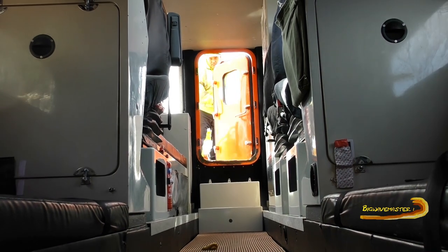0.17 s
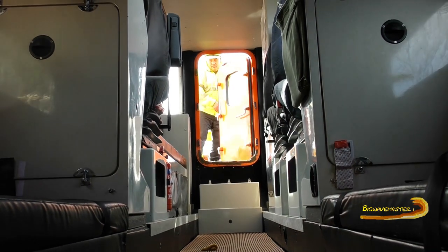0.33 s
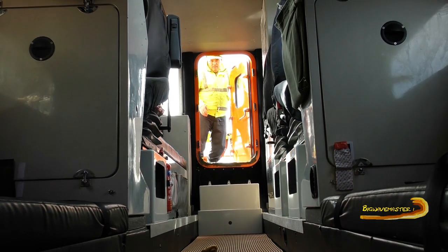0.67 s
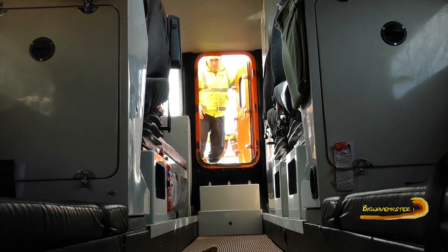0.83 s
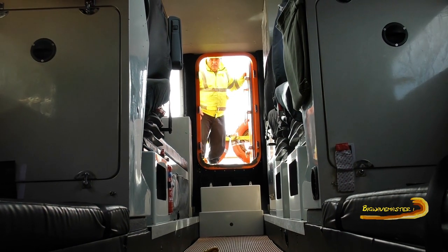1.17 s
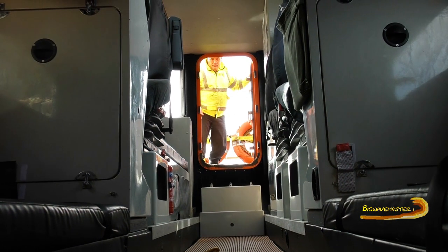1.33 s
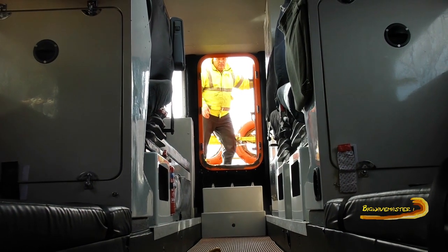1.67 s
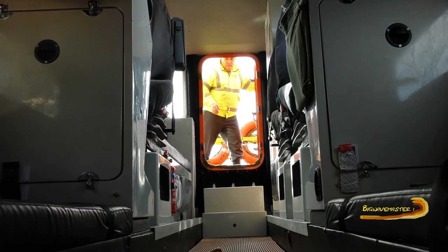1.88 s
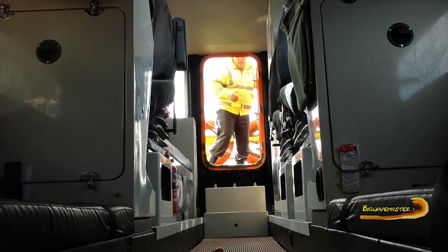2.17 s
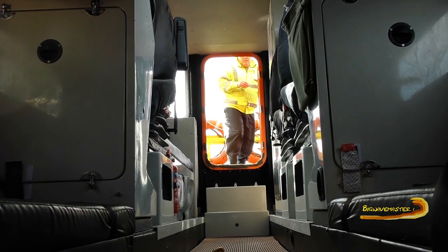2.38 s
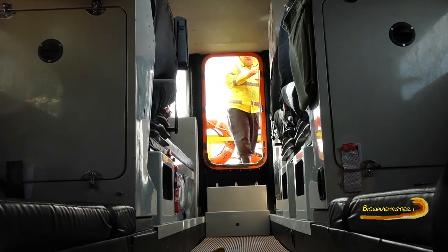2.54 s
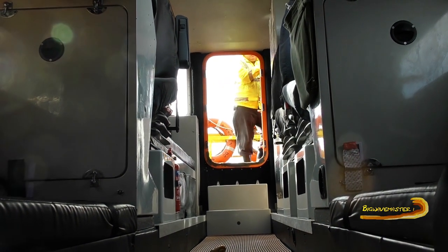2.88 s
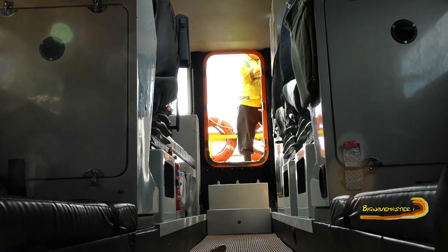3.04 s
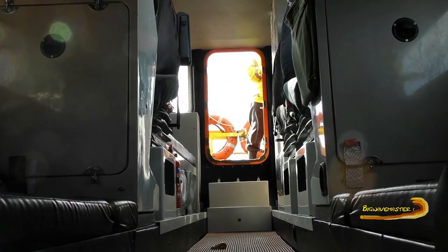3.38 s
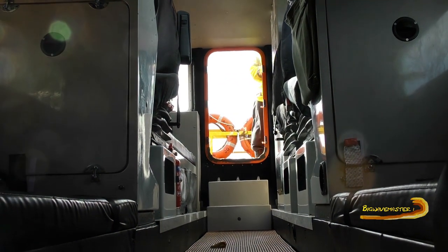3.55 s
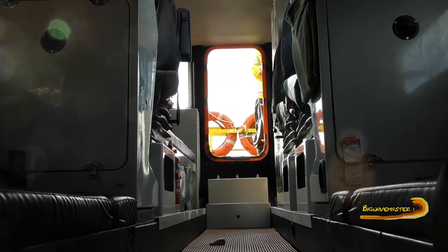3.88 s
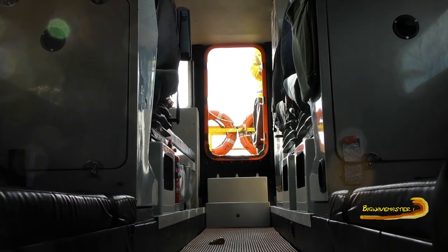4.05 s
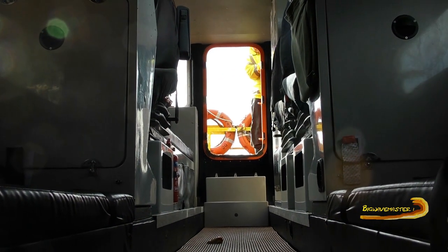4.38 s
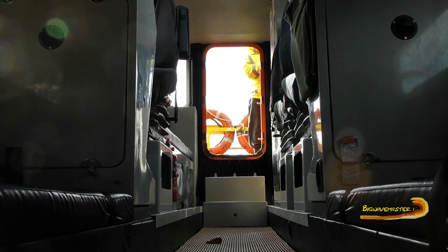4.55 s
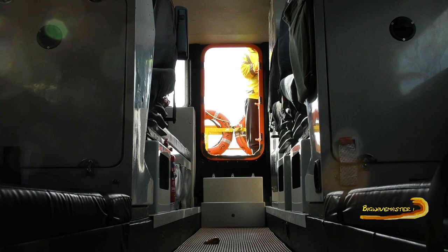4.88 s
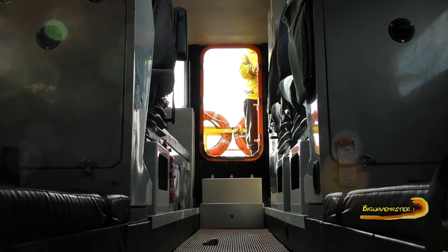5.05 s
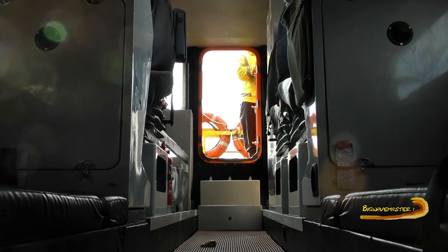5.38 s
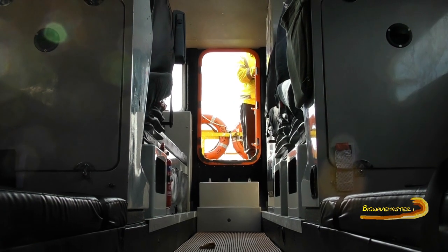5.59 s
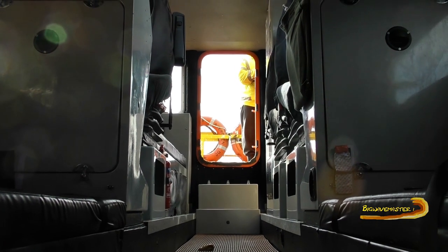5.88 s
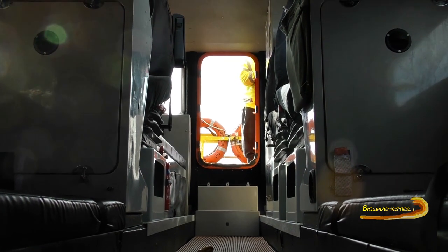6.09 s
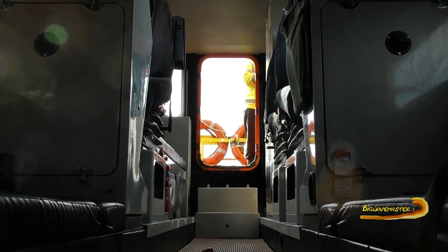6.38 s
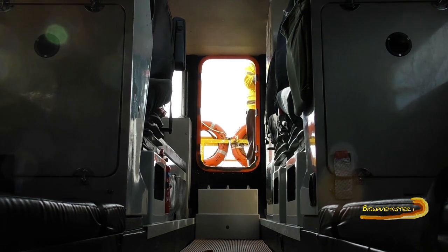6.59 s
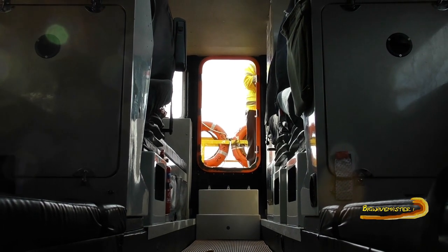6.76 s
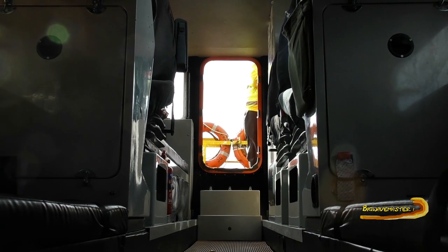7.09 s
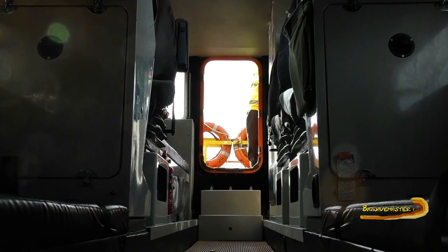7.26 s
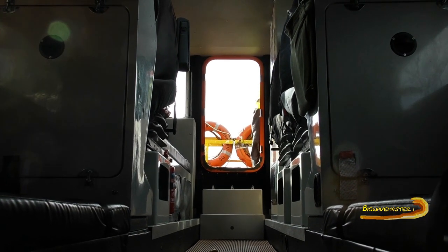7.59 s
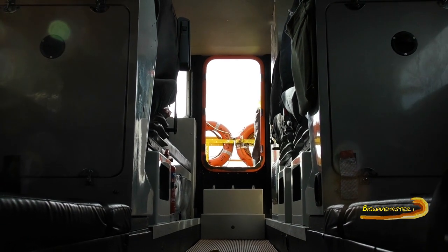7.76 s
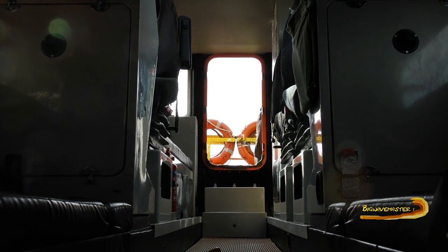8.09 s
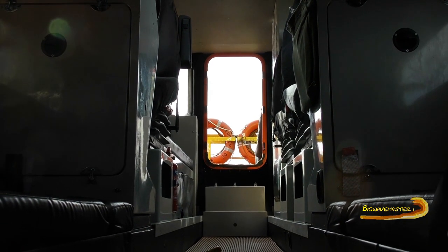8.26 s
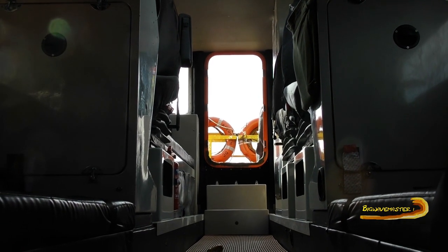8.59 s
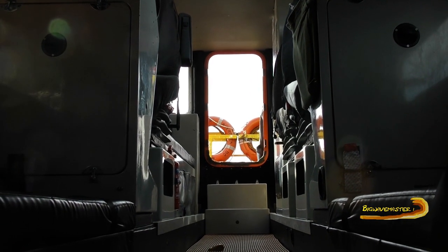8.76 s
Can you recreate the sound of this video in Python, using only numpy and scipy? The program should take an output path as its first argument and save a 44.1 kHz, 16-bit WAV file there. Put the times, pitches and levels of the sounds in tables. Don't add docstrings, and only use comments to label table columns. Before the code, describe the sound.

Heard from inside a small enclosed boat cabin: a sudden steel clang and short rattle, then a low, slightly lumpy diesel drone that seems to grow over four seconds as the microphone gain recovers. Hull and panels hum around it. Fabric scuffs, a sharp slap around three seconds, more rubbing, and thudding boot knocks near seven and eight and a half seconds. Stereo, with the left shadowed in the middle and upper range.

```python
import sys
import numpy as np
from scipy import signal
from scipy.io import wavfile
from scipy.ndimage import uniform_filter1d

SR = 44100
rng = np.random.default_rng(int(sys.argv[2]) if len(sys.argv) > 2 else 0)


def int16_out(signal):
    q = np.round(np.clip(np.atleast_2d(signal).T, -1, 1) * 32767)
    wavfile.write(sys.argv[1], SR, q.astype(np.int16))


def volts_from_db(level):
    exponent = np.asarray(level, float) / 20
    return 10 ** exponent


N = 393813


def rms_one(x):
    return x / np.sqrt(np.mean(x ** 2) + 1e-20)


def in_time(rows):
    s, *columns = np.transpose(rows)
    return [np.interp(np.arange(N) / SR, s, column) for column in columns]


def at_hz(points, hz):
    point_hz, value = np.transpose(points)
    return np.interp(np.log(hz), np.log(point_hz), value)


def drift(rate_hz):
    pole = np.exp(-2 * np.pi * rate_hz * 40 / SR)
    white = rng.standard_normal(N // 40 + 2002)
    slow = signal.lfilter([1], [1, -2 * pole, pole ** 2], white)[2000:]
    return np.interp(np.arange(N) / 40, np.arange(len(slow)), rms_one(slow))


def band_pass(x, low_hz, high_hz, order=2):
    return signal.sosfilt(signal.butter(order, [low_hz, high_hz], "band", fs=SR, output="sos"), x)


def high_pass(x, hz, order):
    return signal.sosfilt(signal.butter(order, hz, "high", fs=SR, output="sos"), x)


def ring(x, hz, width_hz):
    pole = np.exp(-np.pi * width_hz / SR)
    turn = 2 * np.pi * hz / SR
    return signal.lfilter([0, np.sin(turn)], [1, -2 * pole * np.cos(turn), pole ** 2], x + 1e-18)


# frequency in Hz, correlation 0-1.
PORT_LIKENESS = [(30, 0.6), (150, 0.8), (300, 0.88), (600, 0), (1500, 0.46), (5000, 0.13), (12000, 0.47)]


def ports(white, hz):
    alike = np.clip(at_hz(PORT_LIKENESS, hz), 0, 1)
    left = alike * white[0] + np.sqrt(1 - alike ** 2) * white[1]
    return np.array([left, white[0]])


def banded_noise(spectrum, patchy_db, count):
    edges_hz = np.geomspace(spectrum[0][0], min(spectrum[-1][0], 19000), count + 1)
    together = drift(3.2)
    white = rng.standard_normal((2, 2, N))
    out = 0
    for k, (low_hz, high_hz) in enumerate(zip(edges_hz, edges_hz[1:])):
        hz = np.sqrt(low_hz * high_hz)
        flicker_db = patchy_db * (0.4 * together + drift(22))
        band = band_pass(white[k % 2], low_hz, high_hz)
        out = out + volts_from_db(at_hz(spectrum, hz) + flicker_db) * ports(band, hz)
    return rms_one(out)


# frequency in Hz, level in dB, t60 in s.
DOOR_MODES = [(411, -14.5, 0.73), (449, -14, 0.19), (680, -18, .12), (835, -18, 0.33), (950, -8, .12),
              (1262, -5.5, 0.11), (1762, -11.5, 0.13), (2900, -17, 0.11), (3170, -16, 0.067),
              (3600, -19, 0.067), (5250, -20, 0.064)]


def door(level_db, rattle_s):
    t = np.arange(SR) / SR
    fade = np.exp(-(t / rattle_s) ** 2) / np.sqrt(rattle_s * SR)
    out = np.zeros((2, N))
    for hz, db, t60_s in DOOR_MODES:
        rattle = rng.standard_normal((2, SR)) * fade
        out[:, :SR] += volts_from_db(level_db + db) * ring(ports(rattle, hz), hz, 2.65 / t60_s)
    return out


# start in s, level in dB, t60 in s, centre in Hz.
SLAPS = [
    (0, -21, 0.18, 1940),
    (0, -31, 0.21, 5500),
    (.025, -25, 0.38, 427),
    (2.995, -26, 0.48, 1790),
    (2.988, -33.5, 0.27, 5500),
    (6.457, -43.5, 0.15, 8000),
    (7.173, -28, 0.075, 1500),
    (8.572, -30.5, 0.13, 1100),
]
# peak time in s, level in dB, rise in s, centre in Hz.
BRUSHES = [(0.554, -42, 0.074, 2700), (1.859, -47.5, .045, 4500), (2.259, -46, 0.025, 5100),
           (2.51, -47, 0.069, 9500), (2.525, -38, 0.078, 3180), (2.67, -50, 0.11, 7500),
           (2.975, -29.5, .035, 1980), (3.08, -46, 0.15, 4000), (3.621, -41.5, 0.089, 8800),
           (3.6, -35, 0.055, 3600), (3.65, -29.5, 0.049, 3230), (4.329, -49, .18, 5500),
           (6.57, -44.5, 0.077, 3600), (7.67, -50, .06, 6600), (8.5, -56, 0.034, 8000)]


def scuffs(grain_db):
    # s, dB, rise s, fall s, power of the fall, Hz, octaves
    strokes = [(s, db, rise_s, rise_s, 2, hz, 1.3) for s, db, rise_s, hz in BRUSHES]
    strokes += [(s, db, 0.0074, 2 * t60_s / np.log(1000), 1, hz, 2.14) for s, db, t60_s, hz in SLAPS]
    out = np.zeros((2, N))
    for s, db, rise_s, fall_s, power, hz, octaves in strokes:
        first = max(int((s - 2 * rise_s) * SR), 0)
        t = np.arange(first, min(first + SR, N)) / SR - s
        rise = np.exp(-2 * (t / rise_s) ** 2)
        fall = np.exp(-2 * np.abs(t / fall_s) ** power)
        swell = np.where(t < 0, rise, fall)
        white = ports(rng.standard_normal((2, SR)), hz)[:, :len(t)]
        low_hz, high_hz = np.minimum(hz * 2 ** (octaves * np.array([-0.5, 0.5])), 0.45 * SR)
        band = band_pass(white, low_hz, high_hz)
        band = signal.lfilter([1], [1, -0.8], band)
        out[:, first:first + len(t)] += volts_from_db(db) * swell * rms_one(band)
    return out * volts_from_db(grain_db * drift(49))


# time in s, firings per s.
SPEED = [(0.0, 66.262), (0.75, 66.102), (3.75, 66.233), (5.25, 66.175), (6.5, 66.11), (8.25, 66.152),
         (9.0, 66.085)]
# header lag in ms, strength in dB, bank 0 or 1.
CYLINDERS = [(0.1, -3.7, 1), (-1.2, -2.4, 1), (5.3, 2.9, 0), (2.4, 8.0, 1), (0.5, 8.0, 0), (-1.5, 5.2, 0),
             (3.0, -3.7, 1), (4.0, -8.0, 0)]
# frequency in Hz, width in Hz, dB from bank 0, dB from bank 1.
PIPES = [(66.4, 8.0, -11.6, -6.1), (113.1, 49.8, -1.8, -5.2), (129.4, 8.0, -0.4, -3.4),
         (158.9, 8.0, -13.2, -17.5), (179.1, 12.4, 2.1, -3.9), (207.0, 10.3, -8.5, -16.4),
         (246.1, 8.0, -35.6, -12.5), (286.4, 8.0, -40.0, -29.7)]
# frequency in Hz, sharpness as Hz over width.
NOTCHES = [(226, 16), (322, 12)]


def firings(uneven_db, uneven_ms):
    run_in = SR // 2
    per_s = np.r_[np.full(run_in, SPEED[0][1]), in_time(SPEED)[0]]
    fired = np.cumsum(per_s) / SR
    fired -= fired[run_in]
    number = np.arange(-24, int(fired[-1]) - 1)
    lag_ms, strength_db, bank = np.array(CYLINDERS)[number % 8].T
    chance = rng.standard_normal((len(number), 2))
    late_ms = lag_ms + uneven_ms * chance[:, 0]
    at = np.interp(number, fired, np.arange(len(fired))) + late_ms * SR / 1000
    puffs = np.zeros((2, len(fired)))
    puffs[bank.astype(int), np.round(at).astype(int)] = volts_from_db(strength_db + uneven_db * chance[:, 1])
    out = 0
    for k, (hz, width_hz, *bank_db) in enumerate(PIPES):
        sign = (-1) ** k
        out = out + sign * ring(volts_from_db(bank_db) @ puffs, hz, width_hz)
    out = band_pass(out, 27, 330, order=4)
    for hz, sharpness in NOTCHES:
        out = signal.lfilter(*signal.iirnotch(hz, sharpness, fs=SR), out)
    return rms_one(out[run_in:])


# frequency in Hz, density in dB per Hz.
RUMBLE = [(25, -22), (40, -16), (100, -10), (120, -1), (140, -3), (195, -1), (220, -9), (260, -8),
          (330, -10.5)]


def rumble():
    return banded_noise(RUMBLE, 0.5, count=11)


# multiple of the firing rate, level in dB re firing.
HULL_ORDERS = [(4.5, -31), (6, -35), (6.625, -29.5), (7.5, -34)]


def hull_orders(waver_db):
    turn = 2 * np.pi * np.cumsum(in_time(SPEED)[0]) / SR
    out = 0
    for order, db in HULL_ORDERS:
        tone = np.sqrt(2) * np.sin(order * turn + rng.uniform(0, 2 * np.pi))
        out = out + volts_from_db(db + waver_db * drift(1.17)) * tone
    return out


# time in s, level in dB re average.
DOORWAY = [
    (0, 2.5),
    (1.4, -1),
    (2.6, 1),
    (3.1, 1.5),
    (4.6, 2),
    (5.7, 2),
    (7.6, 1),
    (8.93, 1.5),
]


def doorway_db():
    return in_time(DOORWAY)[0]


# frequency in Hz, density in dB per Hz.
ROAR = [(330, -8.5), (380, -2.5), (460, -2), (520, -6.5), (600, -6), (720, -8.5), (850, -17)]


def roar():
    return banded_noise(ROAR, 0.32, count=7)


# frequency in Hz, density in dB per Hz.
BUZZ = [(850, 0.5), (1000, -8.5), (1250, -3.5), (1500, -7.5), (1800, -5), (2150, -10.5), (2500, -13),
        (3100, -17.5), (4000, -21.5)]


def buzz():
    return banded_noise(BUZZ, 1.0, count=9)


# frequency in Hz, density in dB per Hz.
HISS = [(4000, -1.5), (5000, -2), (6300, -7.5), (9000, -7.5), (13000, -12.5), (16000, -7.5)]


def hiss():
    return banded_noise(HISS, 1.0, count=5)


# frequency in Hz, width in Hz, level in dB re firing.
PANELS = [(248, 14, -27), (438.8, 7.7, -34), (494.6, 8.4, -33), (948, 116, -34), (1370, 10, -39.5),
          (1793, 43, -34.5), (2380, 120, -37.5), (4430, 20, -56.5)]


def panels():
    white = rng.standard_normal((2, N))
    return sum(volts_from_db(db) * rms_one(ring(ports(white, hz), hz, width_hz)) for hz, width_hz, db in PANELS)


def passage(open_db):
    centre_hz, hz_per_db, width_hz = 480, 36, 40
    turn = 2 * np.pi * np.cumsum(centre_hz + hz_per_db * open_db) / SR
    pole = np.exp(-np.pi * width_hz / SR)
    slow = signal.lfilter([1], [1, -pole], rng.standard_normal((2, 2, N)))
    tone = slow[0] * np.cos(turn) + slow[1] * np.sin(turn)
    return rms_one(ports(tone, centre_hz))


def gain_db():
    resting_db, rebound_db, rebound_s = -12, 5.5, 0.17
    climb_db_per_s, climb_ends_s = 2, 3.95
    duck_at_s, duck_db, duck_s = 4.45, 1, 1
    t = np.arange(N) / SR
    climb = climb_db_per_s * np.maximum(climb_ends_s - t, 0)
    rebound = rebound_db * np.exp(-t / rebound_s)
    duck = duck_db * (t > duck_at_s) * np.exp(-np.maximum(t - duck_at_s, 0) / duck_s)
    return resting_db - climb - rebound - uniform_filter1d(duck, size=2000)


# start in s, peak in dB, frequency in Hz, t60 in s.
KNOCKS = [
    (2.468, -23, 470, .1),
    (7.172, -30, 2200, .04),
    (7.176, -28, 1350, .08),
    (7.186, -18, 500, .12),
    (8.574, -27, 1000, .12),
    (8.574, -21, 480, .12),
    (8.598, -32, 950, .06),
]


def knocks():
    click = np.arange(SR // 4) == 0
    out = np.zeros(N)
    for s, db, hz, t60_s in KNOCKS:
        first = int(s * SR)
        out[first:first + SR // 4] += volts_from_db(db) * ring(click, hz, np.log(1000) / np.pi / t60_s)
    return out


def scene():
    deck = door(level_db=-6.0, rattle_s=0.027) + scuffs(grain_db=0.9) + knocks()
    engine = volts_from_db(1.5) * (firings(uneven_db=0.3, uneven_ms=0.03) + volts_from_db(-16.5) * rumble())
    engine = engine + hull_orders(waver_db=3.0)
    open_db = doorway_db()
    noise = volts_from_db(-23 + open_db) * roar()
    noise += volts_from_db(-25 + 0.74 * open_db) * buzz()
    noise += volts_from_db(-39.5 + 0.13 * open_db) * hiss()
    hum = volts_from_db(open_db) * panels() + volts_from_db(-28 + 2.0 * open_db) * passage(open_db)
    return volts_from_db(gain_db()) * (engine + noise + hum) + deck


def low_pass(x):
    return signal.sosfilt(signal.butter(12, 15800, fs=SR, output="sos"), x)


def record(dry):
    shadow_hz, open_hz = 110, 1500
    dry = high_pass(dry, 42, order=2)
    pole = np.exp(-2 * np.pi * shadow_hz / SR)
    shaded = signal.lfilter([1 - pole], [1, -pole], dry[0])
    bounced = high_pass(dry[0], open_hz, order=1)
    left = volts_from_db(0.23) * shaded + volts_from_db(-21.5) * dry[0] + volts_from_db(-8.5) * bounced
    return low_pass(np.clip([left, dry[1]], -1, 1))


dry = scene()
out = record(dry)
int16_out(out)
```